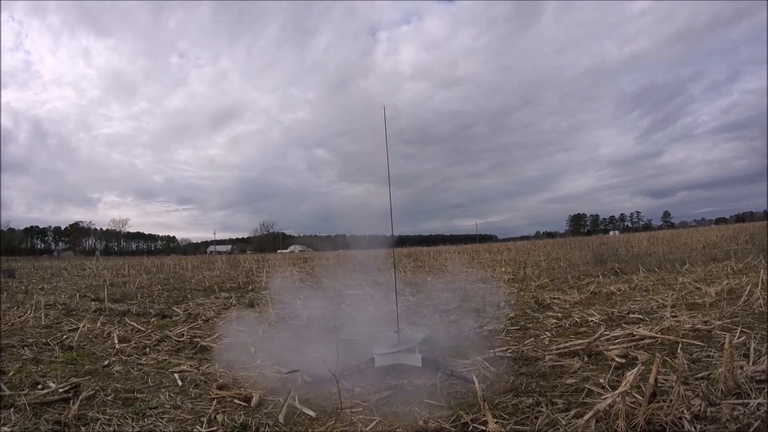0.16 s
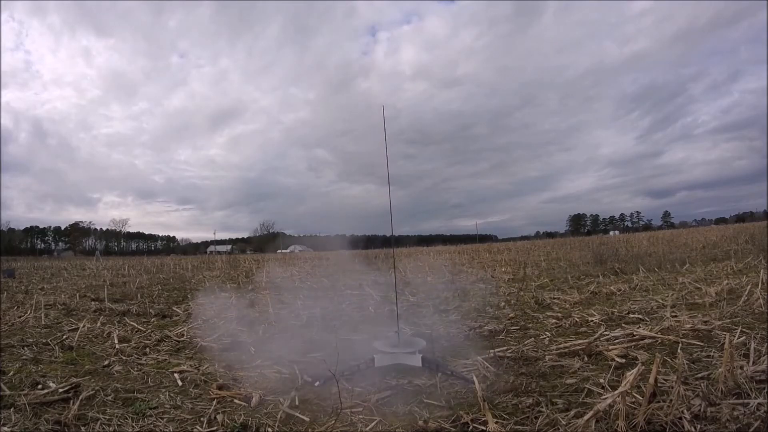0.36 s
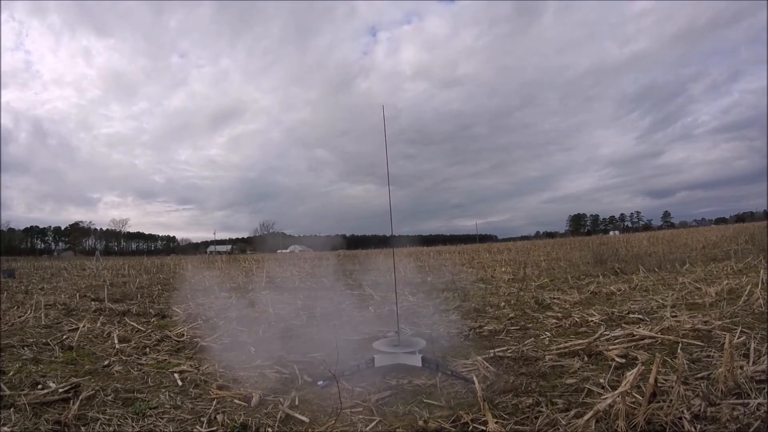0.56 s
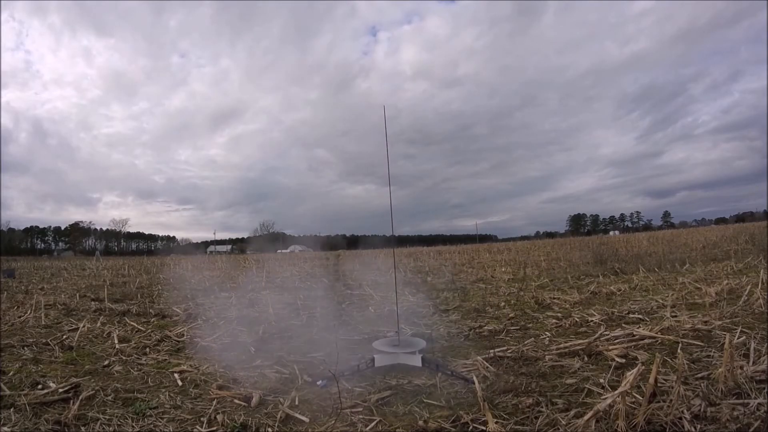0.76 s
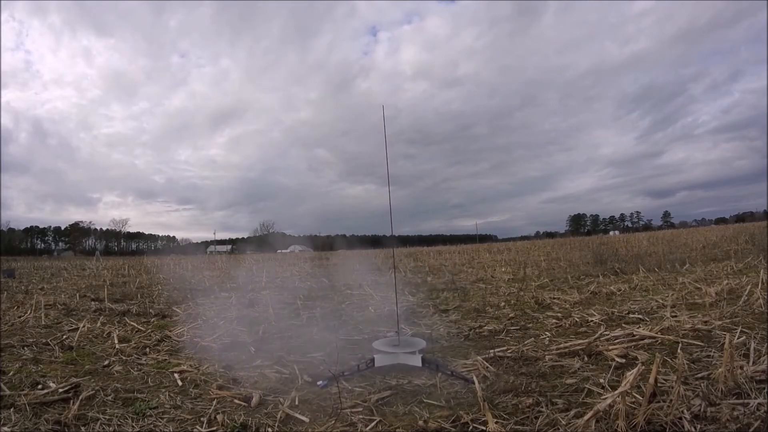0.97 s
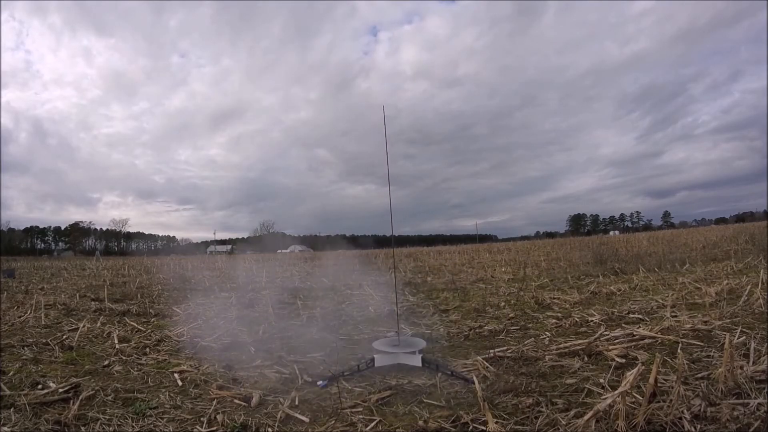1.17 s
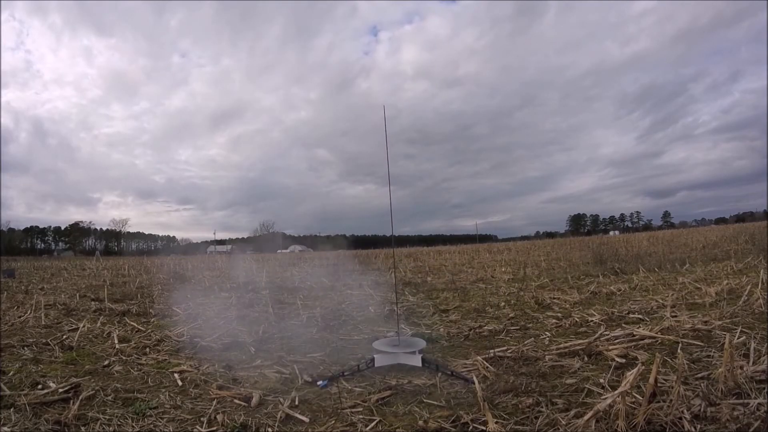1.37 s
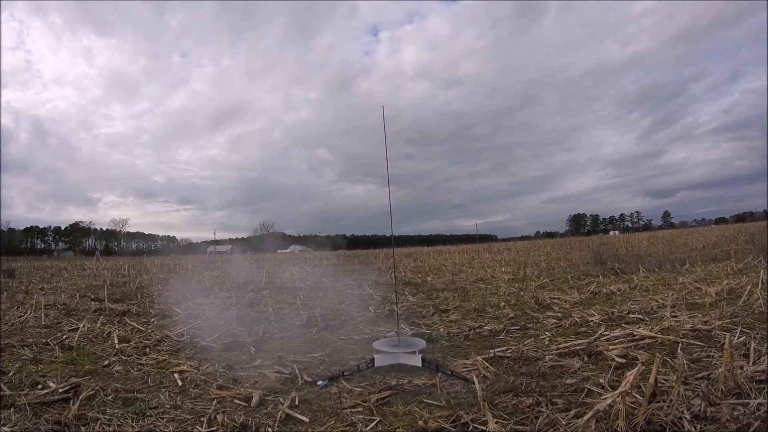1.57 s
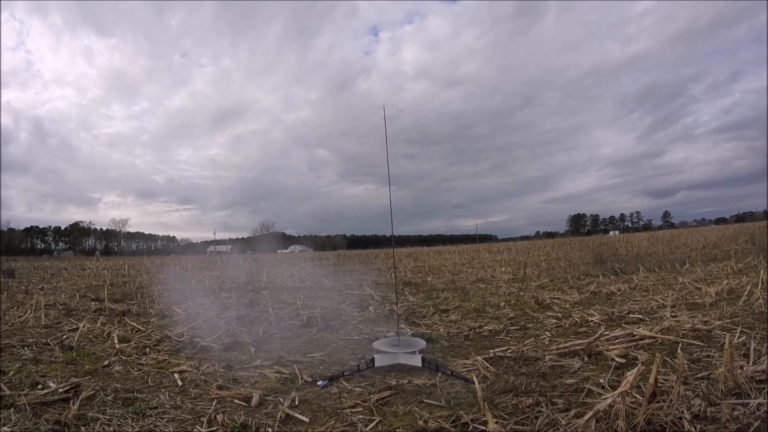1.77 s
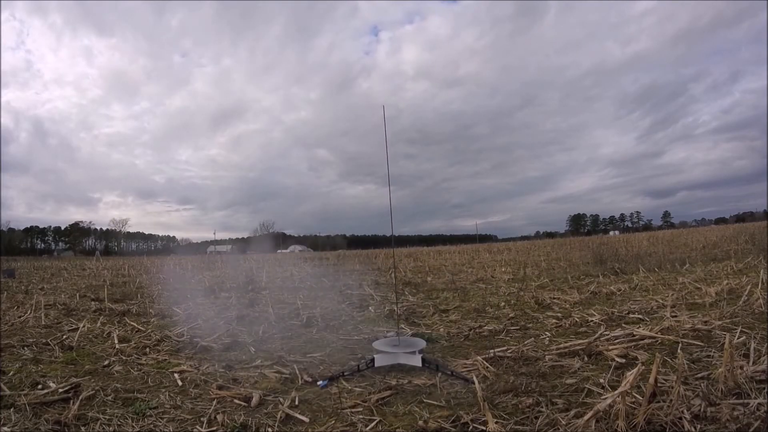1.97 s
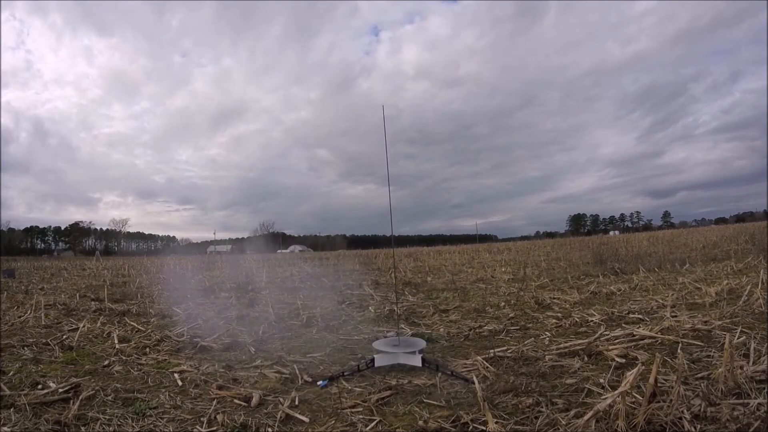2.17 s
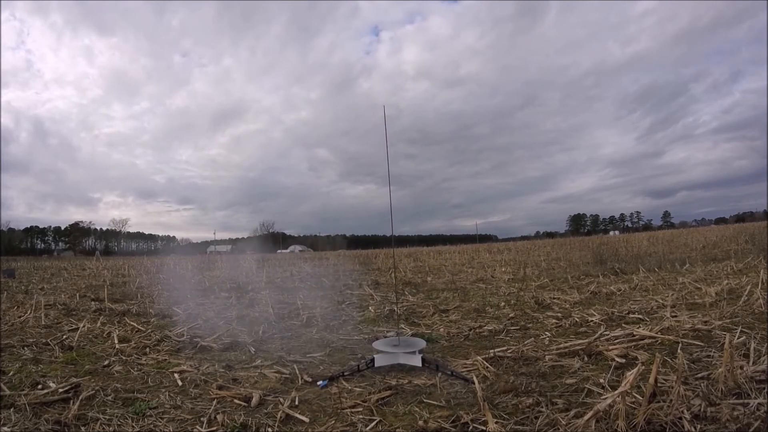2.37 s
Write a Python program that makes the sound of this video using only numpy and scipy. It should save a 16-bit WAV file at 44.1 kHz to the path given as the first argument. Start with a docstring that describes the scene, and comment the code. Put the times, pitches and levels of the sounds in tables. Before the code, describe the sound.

A small solid-fuel rocket motor hisses loudly as it climbs, dulling before cutting off sharply outdoors

```python
"""A small solid-fuel rocket climbs from a low microphone over a stubble field: shaped noise, jet first.
The jet starts bright and dulls with distance, its ground echoes ever later, stalks scattering it after.
From about 1.1 s a light wind, low-passed lumpy noise, rumbles louder on the microphone.
Near 2.15 s the jet cuts off and the emptying chamber hisses briefly; a faint steady hiss,
there all along, is left as the rocket coasts, over the constant hush of the field."""
import sys
import numpy as np
from scipy import signal
from scipy.fft import rfft, irfft, next_fast_len
from scipy.io import wavfile
from scipy.ndimage import uniform_filter1d, map_coordinates

SR = 44100
rng = np.random.default_rng(int(sys.argv[2]) if len(sys.argv) > 2 else 0)


def convert_level_to_amplitude(level_db):
    """Map a level in decibels to its linear amplitude factor."""
    exponent = np.asarray(level_db, float) / 20
    return 10 ** exponent


def transcribe(signal):
    """Save signal, clipped to [-1, 1], as a 16-bit WAV file at the path in sys.argv[1]."""
    frames = np.atleast_2d(signal).T
    limited = np.clip(frames, -1, 1)
    pcm = np.round(limited * 32767).astype(np.int16)
    wavfile.write(sys.argv[1], SR, pcm)


N = 106942  # samples
T_S = np.arange(N) / SR


def unit(x):
    """Scales to rms 1."""
    return x / np.sqrt(np.mean(x ** 2) + 1e-20)


def along(points, hz):
    """Interpolates (Hz, value) points on a log-frequency axis."""
    f, v = np.transpose(points)
    return np.interp(np.log(hz + 1), np.log(f + 1), v)


def column(rows, t_s, index):
    """Interpolates one column of a table whose first column is time."""
    columns = np.transpose(rows)
    return np.interp(t_s, columns[0], columns[index])


def wobble(knots_per_s):
    """Smooth random curve: a spline through Gaussian noise."""
    return map_coordinates(rng.standard_normal(400), [np.arange(N) * knots_per_s / SR])


def filtered(x, response):
    """Multiplies the spectrum of x by a response of frequency in Hz."""
    m = next_fast_len(N + 8192)
    return irfft(rfft(x, m) * response(np.fft.rfftfreq(m, 1 / SR)), m)[..., :N]


def noise(spectrum):
    """Coloured Gaussian noise of rms 1."""
    return unit(filtered(rng.standard_normal(N), lambda hz: convert_level_to_amplitude(along(spectrum, hz))))


# jet course: t/s, level/dB, dullness (0 = near colour, 1 = far colour)
JET_COURSE = [(0, -29.5, 0.36), (.06, -27, 0.052), (.12, -25.5, .02), (.17, -25, 0.085), (.25, -24.5, 0.19),
              (.29, -26, 0.17), (.4, -26, 0.13), (.5, -26, 0.012), (.62, -29, 0.28), (.87, -30.5, 0.25),
              (1.03, -31, 0.43), (1.2, -31, 0.56), (1.35, -29.5, 0.73), (1.45, -30, 0.88), (1.6, -28, 0.82),
              (1.74, -30, 1.06), (1.85, -29.5, .98), (2.0, -29, 1), (2.1, -31.5, 0.98),
              (2.134, -33.5, 1.13), (2.144, -39.5, 1.2), (2.154, -48, 1.2), (2.18, -93, 0.95)]
# jet spectral density, near and far: f/Hz, relative density/dB
NEAR_COLOUR = [(70, -68), (120, -45), (200, -21.5), (300, -21), (500, -14.5), (800, -9.5), (1250, -17),
               (1550, -14.5), (1900, -6.5), (2450, -8.5), (3300, -2), (3900, -2.5), (4650, -4.5),
               (6500, -5.5), (8200, -7), (9500, -17), (10900, -14.5), (13000, -23), (15200, -30)]
FAR_COLOUR = [(70, -60), (120, -39), (200, -25), (300, -24), (500, -15), (780, -12.5), (1050, -19),
              (1300, -14), (1600, -11.5), (2070, -2.5), (2350, -3.5), (2600, -10), (3300, -11),
              (4200, -11.5), (6560, -15), (8500, -19.5), (9500, -32), (12000, -35.5), (15200, -53)]


def jet():
    """Turbulent jet noise: randomly patchy in time and frequency, duller far off, unsteady with the burn."""
    flicker_db, flutter_db = 0.38, 0.57  # slow and fast unsteady burning
    patchy_db = 1.1  # random patchiness across time and frequency
    hz, frame_s, z = signal.stft(rng.standard_normal(N), SR, nperseg=512)
    dull = column(JET_COURSE, frame_s, 2)
    near_db = along(NEAR_COLOUR, hz)[:, None]
    far_db = along(FAR_COLOUR, hz)[:, None]
    colour = convert_level_to_amplitude(near_db * (1 - dull) + far_db * dull)
    colour = colour / np.sqrt(np.mean(colour ** 2, axis=0))
    patches = uniform_filter1d(rng.standard_normal(z.shape), size=5, axis=0)
    patches = unit(uniform_filter1d(patches, size=10, axis=1))
    hiss = signal.istft(z * colour * convert_level_to_amplitude(patchy_db * patches), SR, nperseg=512)[1][:N]
    level_db = column(JET_COURSE, T_S, 1) + flicker_db * wobble(12.12) + flutter_db * wobble(130)
    return unit(hiss) * convert_level_to_amplitude(level_db)


# hiss level after burnout: t/s, level/dB
TAIL_LEVEL = [(2.12, -80), (2.145, -49), (2.18, -47), (2.192, -57), (2.23, -59), (2.26, -72), (2.32, -95)]
# its spectral density: f/Hz, relative density/dB
TAIL_COLOUR = [(100, -30), (250, -1), (800, -2), (1300, -10), (2200, 1.5), (3500, -5.5), (6500, -5),
               (9000, -16), (15000, -38)]


def tail_off():
    """Flatter, weak hiss of the chamber emptying after burnout."""
    level_db = column(TAIL_LEVEL, T_S, 1) + 1.5 * wobble(90)
    return noise(TAIL_COLOUR) * convert_level_to_amplitude(level_db) * (T_S > TAIL_LEVEL[0][0])


# coasting hiss: f/Hz, relative density/dB
COAST_COLOUR = [(100, -28), (200, -27), (400, -20), (800, -22), (1430, -34), (2100, -15.5), (2600, -20.5),
                (4700, -17.5), (7000, -25.5), (10000, -39), (15000, -52)]


def coasting():
    """Faint steady rocket hiss, present throughout and bared by burnout."""
    return convert_level_to_amplitude(-60) * noise(COAST_COLOUR)


# ground echoes: lag with rocket overhead/ms, signed gain overhead, half-amplitude f/Hz (soil absorbs above)
GROUND_ECHOES = [(3.872, 0.6, 920), (3.56, -0.22, 3700), (3.77, 0.29, 12000), (3.99, 0.43, 6800),
                 (4.24, -0.26, 9400)]


def ground(x):
    """Ground echoes: lag follows the sine of elevation; low elevation weakens them."""
    start_m, speed_m_s, push_m_s2, pad_m = 2.19, 11.96, 47, 2.46  # pad_m: horizontal distance
    waver_ms, grazing_power, fitful_db = 0.025, 1.3, 1  # moving air; low-angle loss; unsteadiness
    height_m = start_m + speed_m_s * T_S + 0.5 * push_m_s2 * T_S ** 2
    sine = height_m / np.hypot(height_m, pad_m)
    drift_ms = waver_ms * wobble(5.8)
    echoes = 0
    for overhead_ms, gain, soil_hz in GROUND_ECHOES:
        soft = filtered(x, lambda hz: 1 / (1 + (hz / soil_hz) ** 2))
        lag_s = (overhead_ms * sine + drift_ms) / 1000
        echoes = echoes + gain * map_coordinates(soft, [(T_S - lag_s) * SR], mode="mirror")
    return sine ** grazing_power * convert_level_to_amplitude(fitful_db * wobble(9.01)) * echoes


def stubble(x):
    """Short decaying random scatter from stalks; patterns crossfade as the rocket moves."""
    start_ms, t60_s, level_db, renew_s = 4.3, 0.023, -13, 0.242
    t = np.arange(SR // 20) / SR - start_ms / 1000
    tails = rng.standard_normal((16, len(t))) * convert_level_to_amplitude(-60 * t / t60_s) * (t > 0)
    tails = tails / np.linalg.norm(tails, axis=1, keepdims=True)
    turn = T_S / renew_s - np.arange(16)[:, None]
    parts = x * np.cos(np.pi / 2 * np.clip(turn, -1, 1))
    scatter = signal.fftconvolve(parts, tails, axes=1).sum(axis=0)[:N]
    return convert_level_to_amplitude(level_db) * scatter


# resonances of the microphone recess: f/Hz, width/Hz, extra gain
CAVITY_MODES = [(2050, 110, 0.24), (3223, 63, 0.32), (6430, 220, 0.57)]


def housing(hz):
    """Response of the recess resonances and a short echo off the microphone's housing."""
    echo_ms, echo_gain = 0.835, -0.05
    rings = 0
    for centre_hz, width_hz, gain in CAVITY_MODES:
        damping = 1j * hz * width_hz
        rings = rings + gain * damping / (centre_hz ** 2 - hz ** 2 + damping)
    return (1 + rings) * (1 + echo_gain * np.exp(-2j * np.pi * hz * echo_ms / 1000))


# wind rumble: t/s, level/dB
WIND_LEVEL = [(0.0, -73.5), (1.13, -66.5), (1.41, -59), (1.43, -63), (1.5, -55), (1.56, -65), (1.6, -56),
              (1.73, -62), (1.83, -55.5), (1.93, -57), (2.26, -58), (2.3, -54), (2.33, -63), (2.42, -57)]
# its spectral density: f/Hz, relative density/dB
RUMBLE_COLOUR = [(8.8, -35), (15, -10.5), (65, 1.5), (108, -2), (161, -9.5), (200, -7.5), (260, -38),
                 (440, -120)]


def wind():
    """Low lumpy wind noise on the microphone."""
    gusty_db = 1.5
    return noise(RUMBLE_COLOUR) * convert_level_to_amplitude(column(WIND_LEVEL, T_S, 1) + gusty_db * wobble(9.1))


# open-air hush: f/Hz, relative density/dB
FIELD_COLOUR = [(100, -26), (200, -5), (400, -11.5), (900, -12), (2000, -12), (6000, -24), (15000, -50)]


def field_hush():
    """Constant open-air background noise."""
    return convert_level_to_amplitude(-66.5) * noise(FIELD_COLOUR)


def scene():
    """Rocket with echoes through the housing, plus wind and field."""
    rocket = jet() + tail_off() + coasting()
    heard = filtered(rocket + ground(rocket) + stubble(rocket), housing)
    return (heard + wind() + field_hush())[None]


# moments of thinning: t/s, half-width/s, mean drop-out limit/dB under the strongest band
THIN_MOMENTS = [(0.852, 0.015, 11.5), (1.143, 0.016, 10), (1.167, 0.015, 8), (1.44, 0.012, 24),
                (1.483, 0.011, 14.5), (1.717, 0.012, 24), (2.228, 0.012, 21)]


def thinned(x):
    """Briefly attenuates bands far under the strongest one."""
    depth_db, scatter_db, knee_db = -16, 5.5, 4  # scatter: of the limit, band to band
    hz, frame_s, z = signal.stft(x, SR, nperseg=512, noverlap=448)
    lucks = rng.standard_normal((len(THIN_MOMENTS), len(hz)))
    for (at_s, half_s, under_db), luck in zip(THIN_MOMENTS, lucks):
        shape = np.cos(np.pi / 2 * np.clip((frame_s - at_s) / half_s, -1, 1)) ** 2
        power = uniform_filter1d(np.abs(z) ** 2 @ shape, size=4, axis=-1)
        below_db = 10 * np.log10(power.max() / (power + 1e-20))
        limit_db = under_db + scatter_db * unit(uniform_filter1d(luck, size=4))
        weak = np.clip((below_db - limit_db) / knee_db + 0.5, 0, 1)
        z = z * convert_level_to_amplitude(depth_db * weak[..., None] * shape)
    return signal.istft(z, SR, nperseg=512, noverlap=448)[1][..., :N]


def roll_off(x):
    """The treble ends steeply here."""
    return signal.sosfilt(signal.butter(12, 15180, fs=SR, output="sos"), x)


def record(dry):
    """Brief thinning, then a steep treble limit."""
    top_hz = 15180
    mix = filtered(thinned(dry), lambda hz: hz < top_hz)
    return roll_off(mix)


dry = scene()
out = record(dry)
transcribe(out)
```